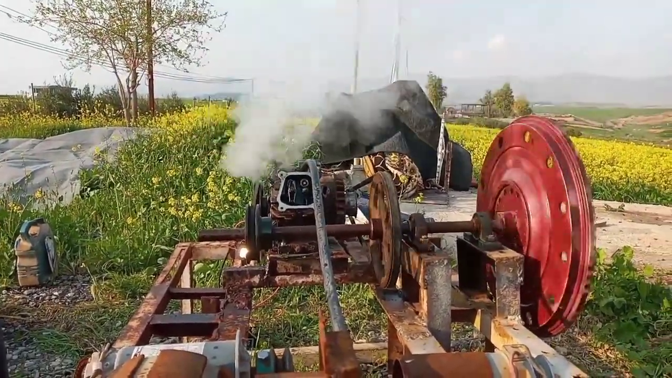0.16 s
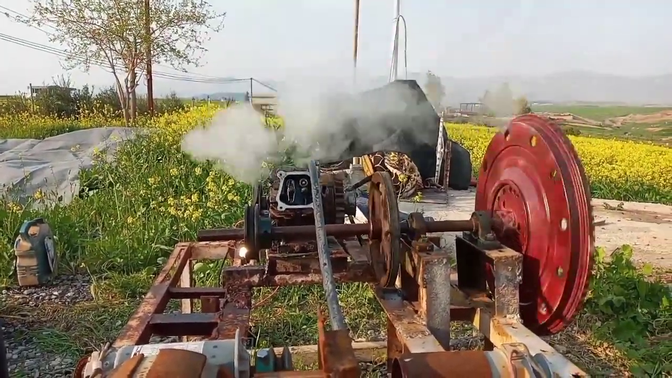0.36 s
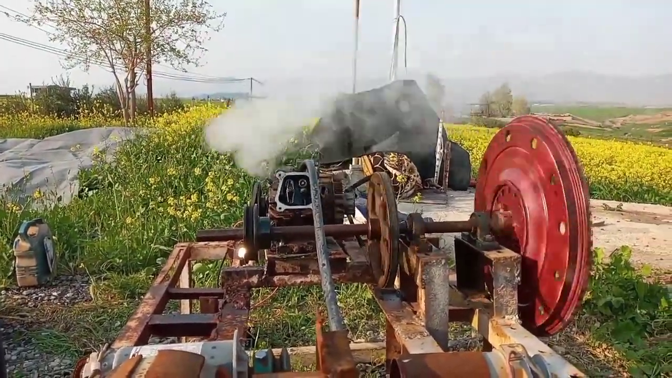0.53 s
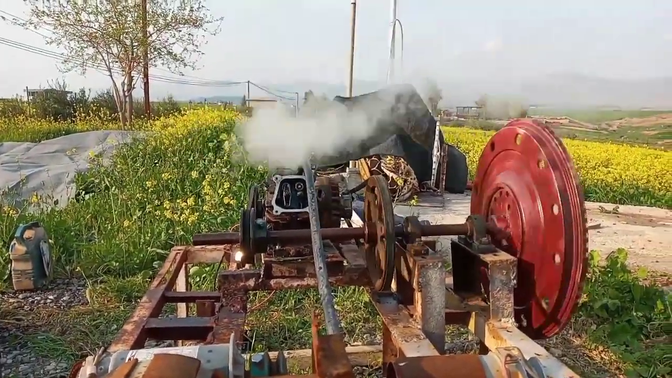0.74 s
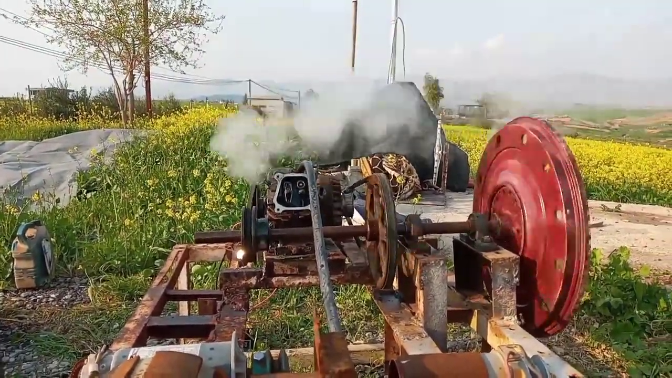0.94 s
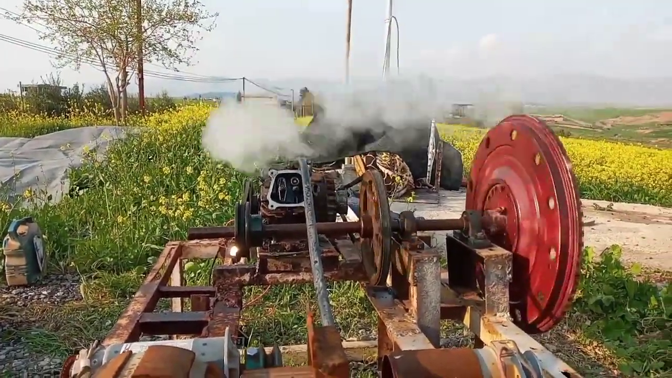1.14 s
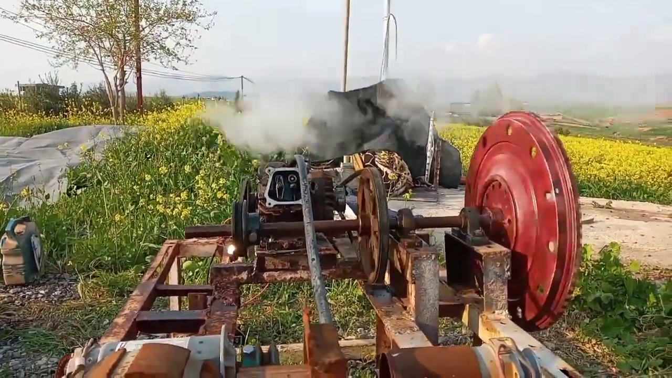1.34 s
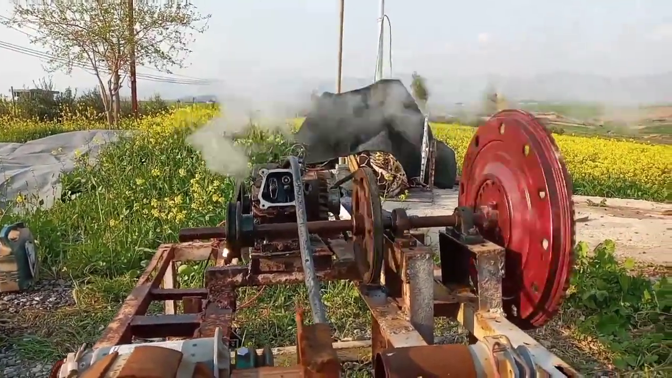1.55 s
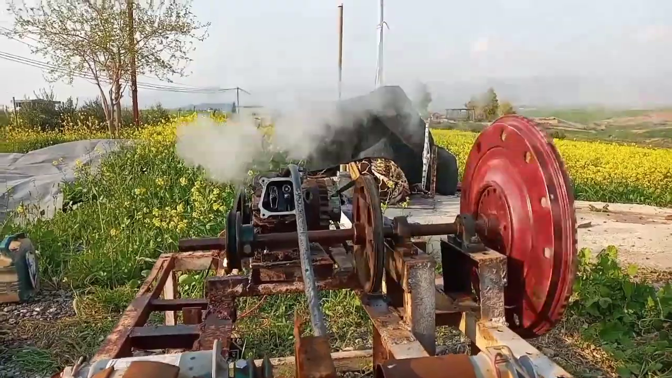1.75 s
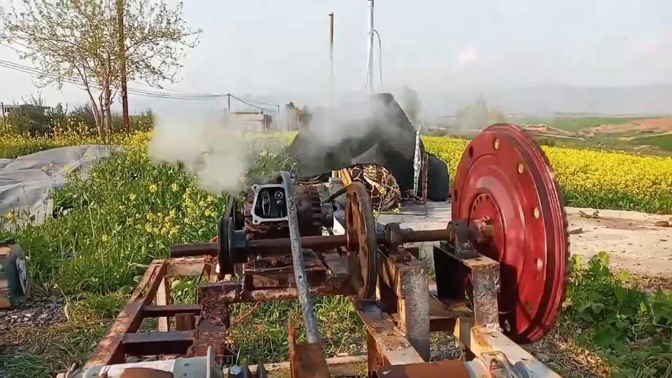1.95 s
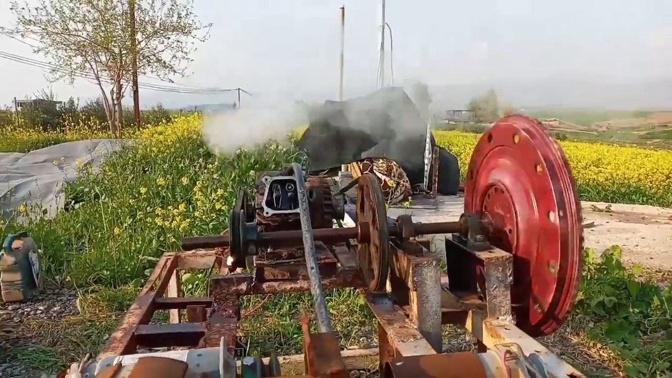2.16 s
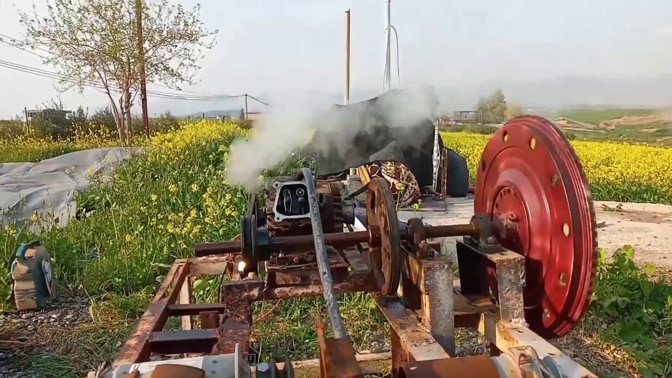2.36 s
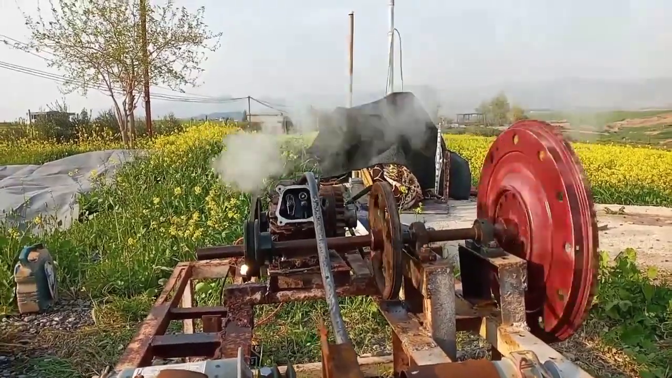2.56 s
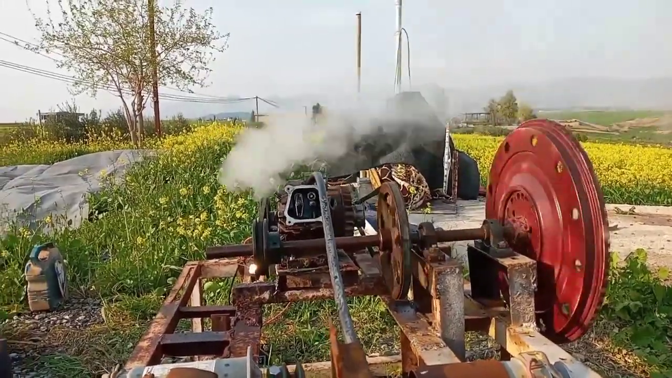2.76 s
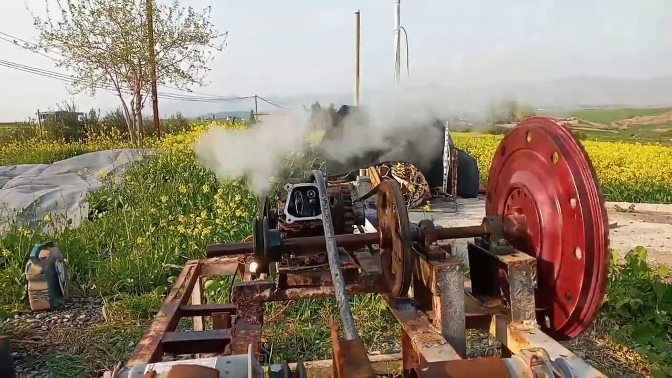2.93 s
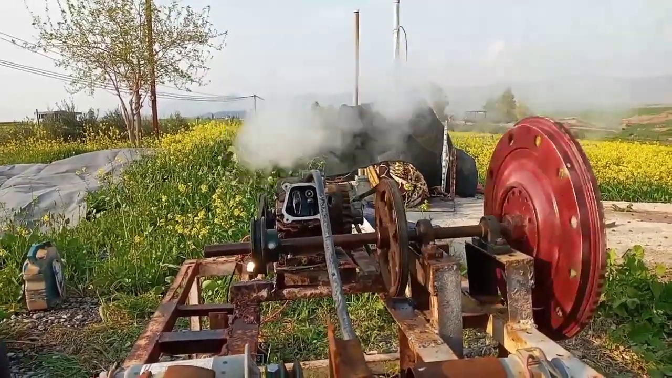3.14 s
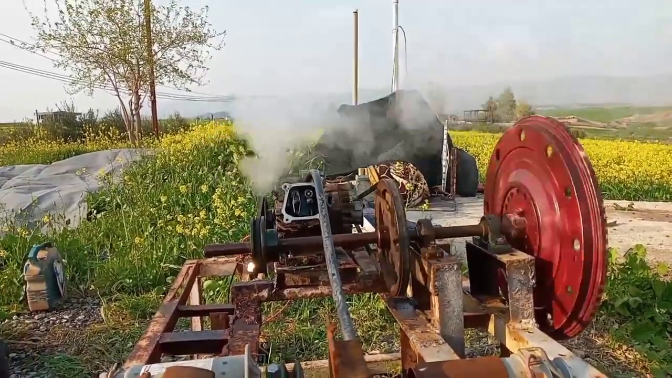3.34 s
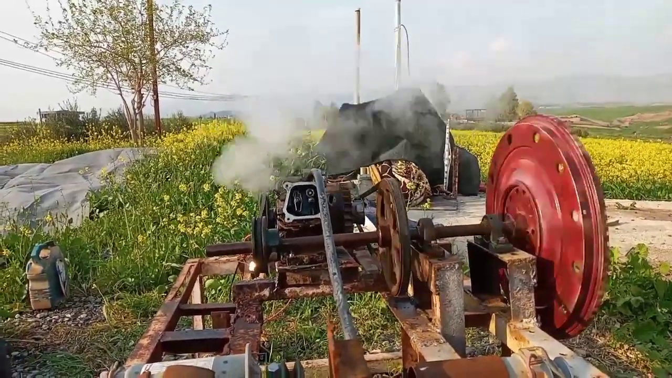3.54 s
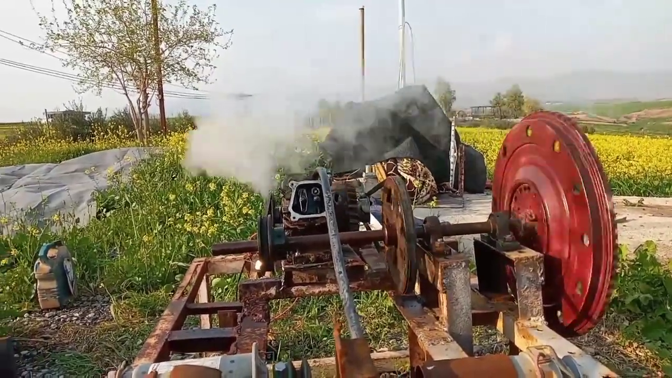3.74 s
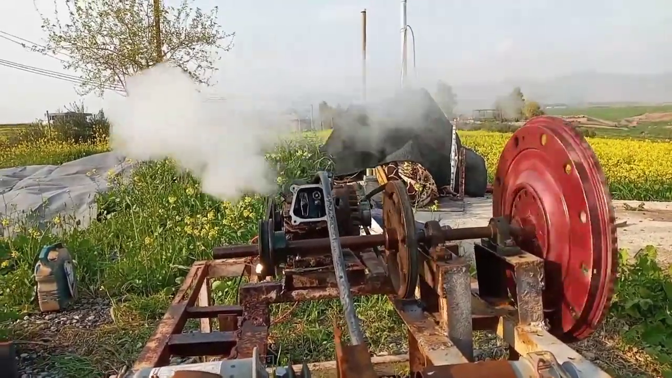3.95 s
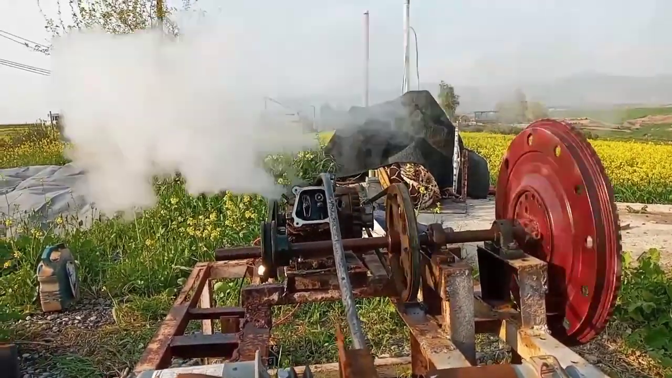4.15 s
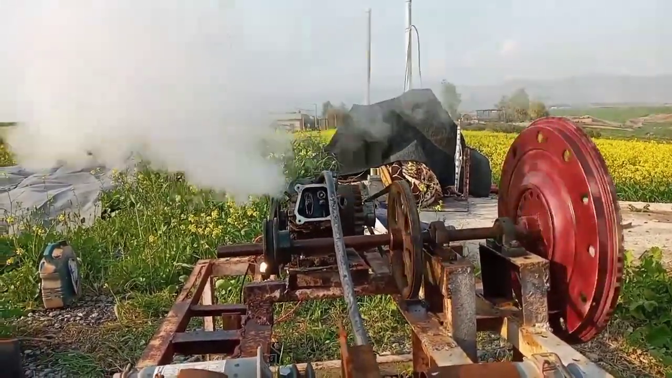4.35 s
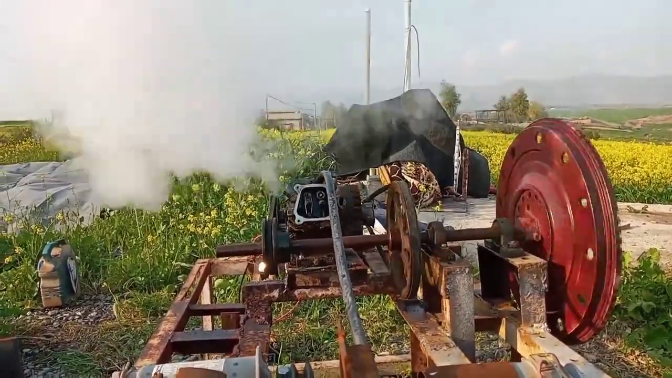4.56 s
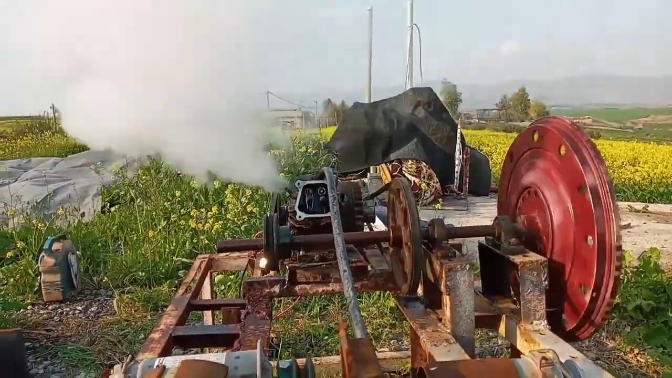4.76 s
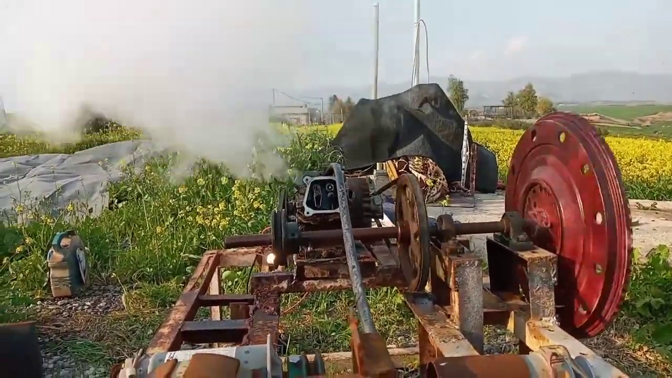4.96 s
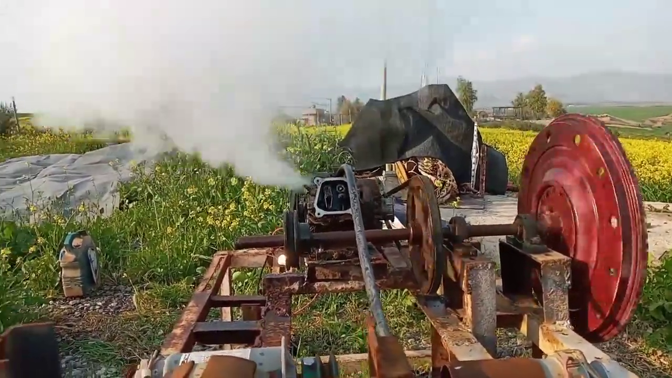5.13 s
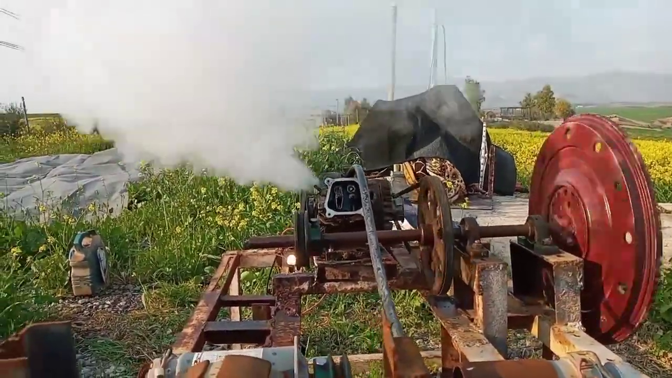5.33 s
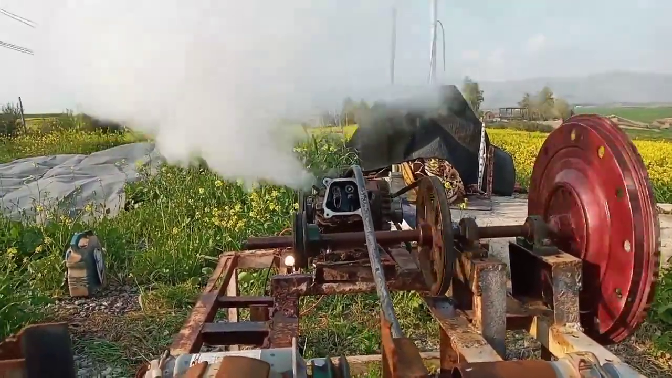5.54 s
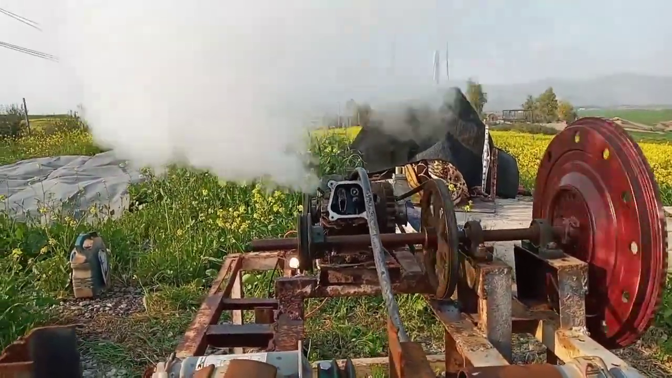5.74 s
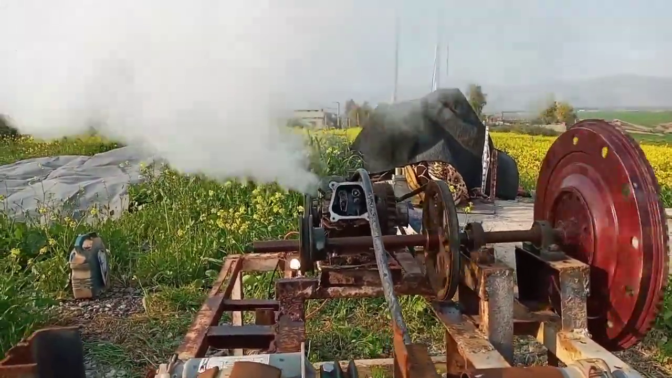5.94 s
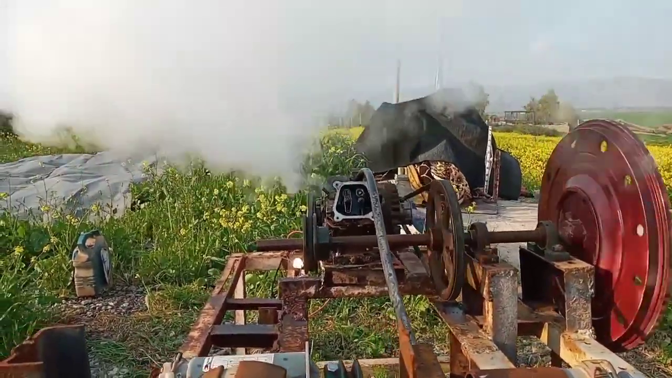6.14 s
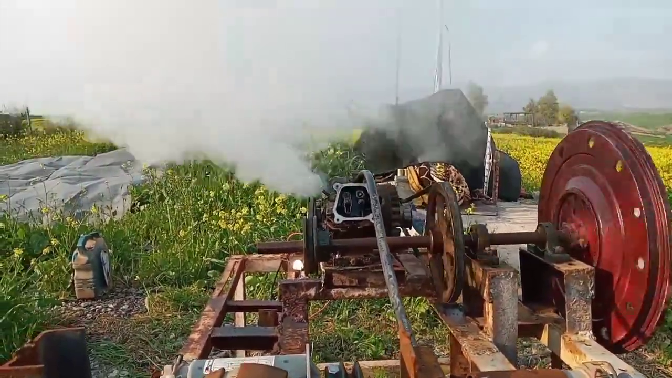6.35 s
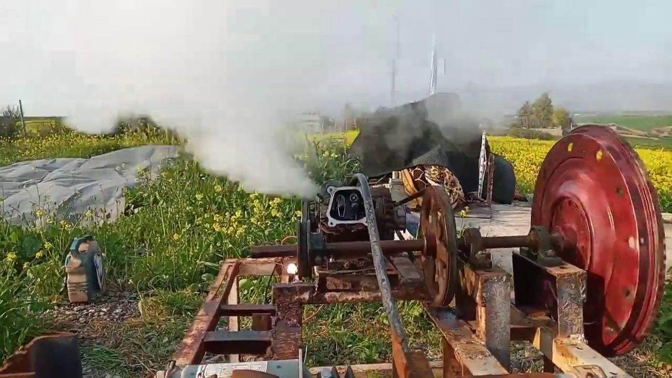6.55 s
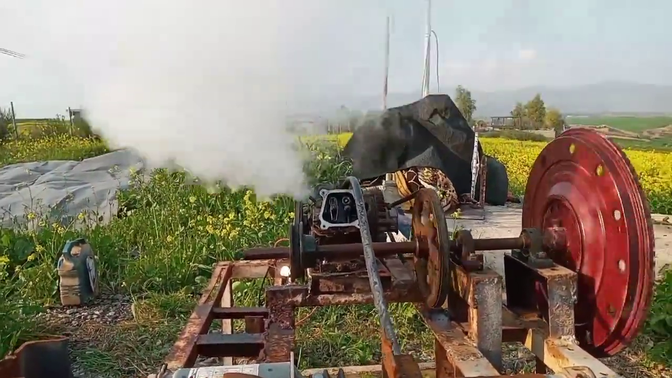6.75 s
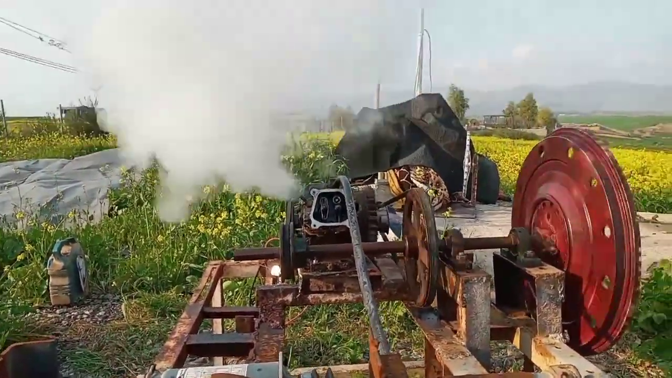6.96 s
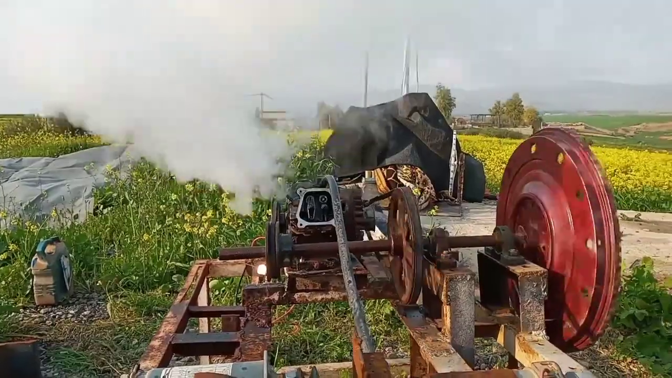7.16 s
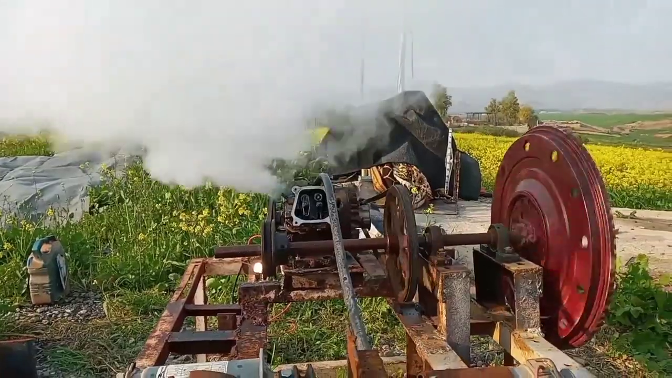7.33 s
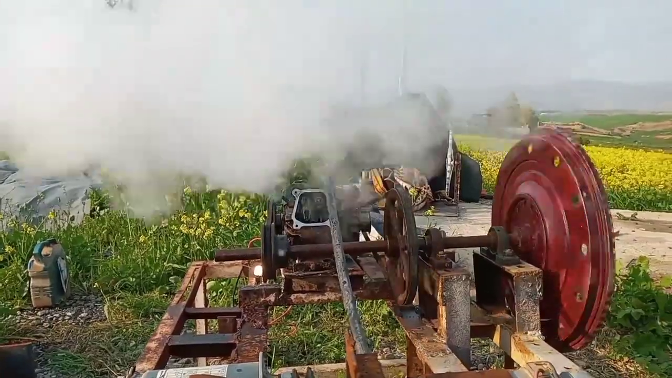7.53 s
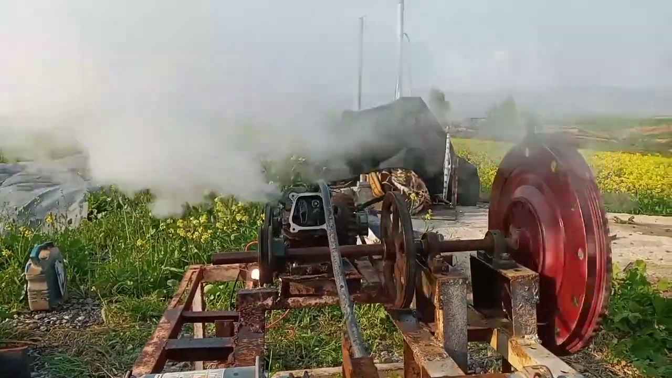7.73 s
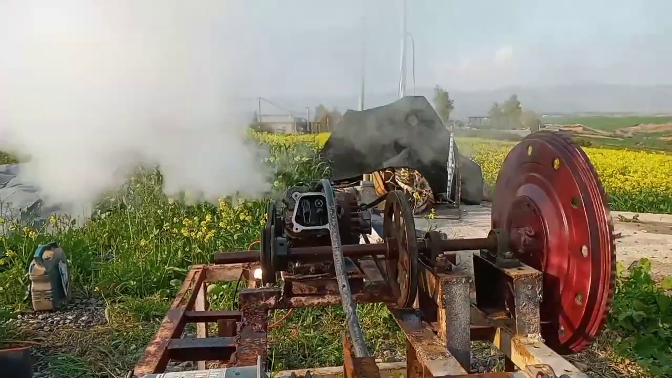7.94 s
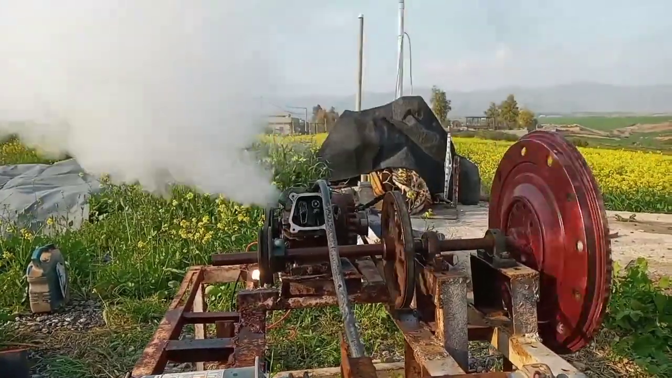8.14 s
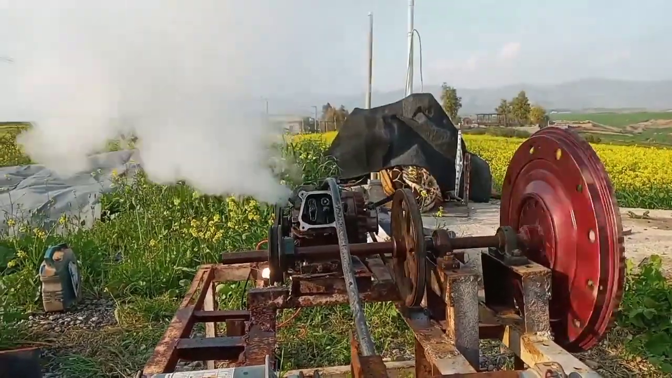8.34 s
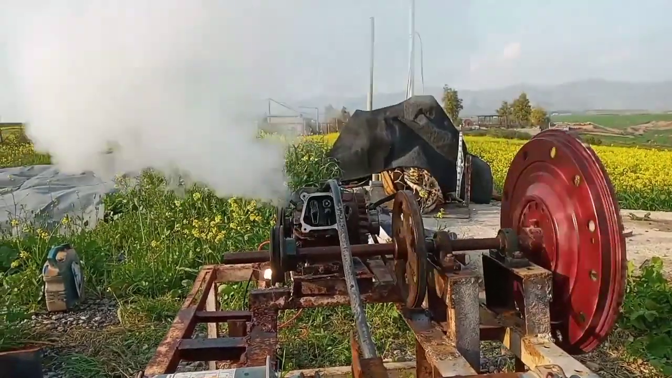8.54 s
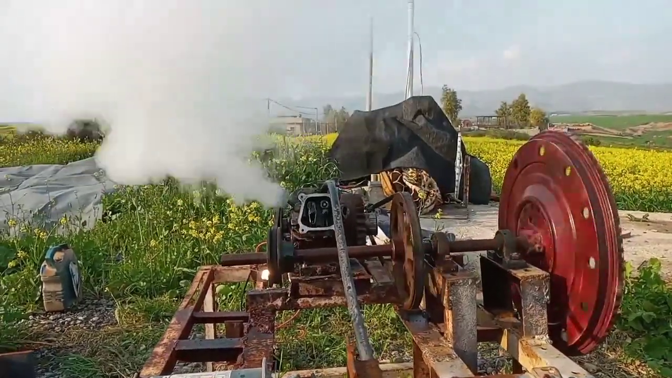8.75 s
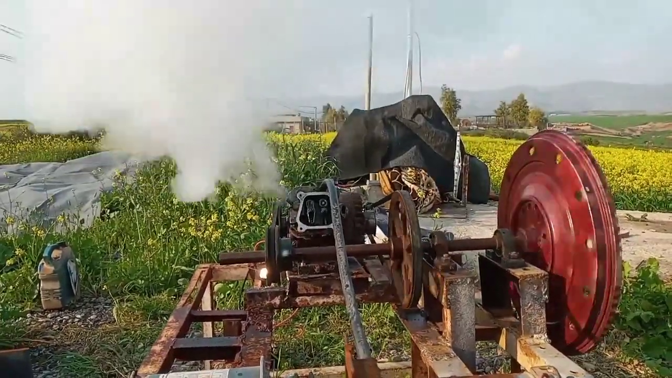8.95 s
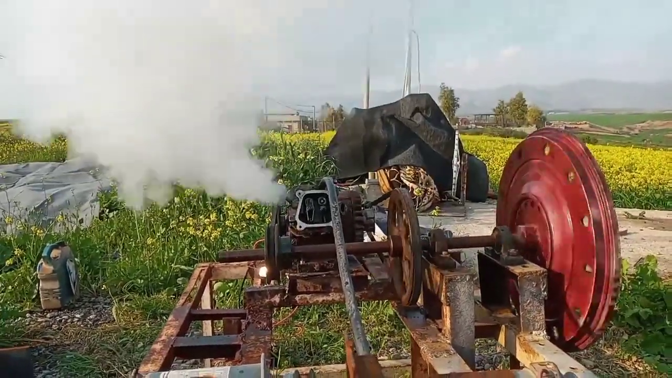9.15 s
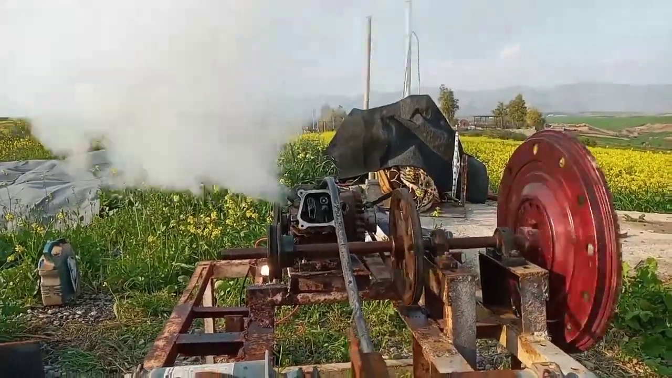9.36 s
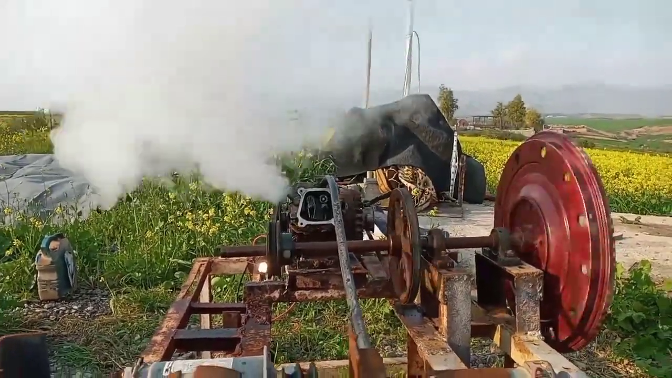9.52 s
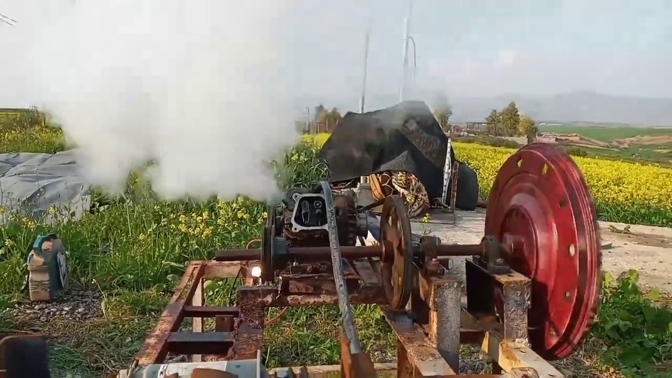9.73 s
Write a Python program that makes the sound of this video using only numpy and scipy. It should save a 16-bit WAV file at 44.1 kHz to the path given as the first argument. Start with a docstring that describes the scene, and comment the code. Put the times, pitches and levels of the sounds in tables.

```python
"""Steam chuffs twice a turn with a slight limp: first at idle with a leaking hiss, then, from about 4 s,
faster and harder with less leak. Drops of water crack in the pipe early on, and wind gusts rumble in stereo.
Each chuff is coloured noise shaped by a valve: a short blast, a hissing jet, a soft thump and a hollow note.
The leak and the wind are noise too. Two reflections and a thin scatter place the engine in the open air."""
import sys
import numpy as np
from scipy import signal
from scipy.fft import rfft, irfft, next_fast_len
from scipy.io import wavfile
from scipy.ndimage import map_coordinates

SR = 44100
rng = np.random.default_rng(int(sys.argv[2]) if len(sys.argv) > 2 else 0)


def dump(signal):
    """Clip the signal to [-1, 1] and save it as 16-bit WAV at the path in sys.argv[1]."""
    limited = np.clip(np.atleast_2d(signal).T, -1, 1)
    pcm = np.round(limited * 32767).astype(np.int16)
    wavfile.write(sys.argv[1], SR, pcm)


N = 431738
TIME = np.arange(N) / SR  # seconds

# How the engine is run. Each row: time in seconds, throttle from 0 to 1, base level of the leak in dB.
RUNNING = [(0, 0, -18.5), (3.7, 0, -18.5), (3.93, 0.7, -19.5), (4.07, 0.87, -25.5), (4.6, 0.94, -23),
           (5, 1, -27), (9.8, 0.98, -25.5)]
# Flywheel speed. Each row: time in seconds, speed in turns per second.
FLYWHEEL_SPEED = [(0.0, 3.2637), (2.0, 3.019), (2.82, 3.1006), (2.97, 2.9557), (3.89, 3.0313),
                  (4.12, 3.3609), (4.8, 3.7117), (4.95, 3.6865), (6.03, 3.9309), (7.88, 3.8815),
                  (8.06, 3.9991), (8.71, 4.0436), (9.22, 3.9226), (9.8, 4.0529)]
# The outward and return exhaust strokes. Each row: crank angle in turns, time the valve is open in turns,
# base level of the jet in dB, base level of the blast in dB.
IDLE_STROKES = [(0, 0.379, -20.5, -20), (0.5114, 0.346, -21, -20.5)]
LOADED_STROKES = [(0, 0.3717, -13.5, -14.5), (0.5253, 0.32, -13, -15)]
# Drops of water spat from the pipe. Each row: time in seconds, starting level in dB.
SPITS = [(.421, -26), (.57, -13), (1.21, -32), (1.41, -19), (2.063, -26)]
# Wind gusts. Each row: start in seconds, length in seconds, left level in dB, right level in dB.
GUSTS = [(0, 0.38, -32, -43), (0.082, 0.22, -49, -21), (.8, 0.77, -44, -55), (0.957, 0.07, -28, -41),
         (1.5, 0.535, -32, -56), (2.054, .53, -34.5, -44), (3.058, 0.73, -41, -50), (3.42, 0.056, -31, -32),
         (5.08, .3, -42, -27), (5.397, 0.21, -51, -31), (5.645, 0.52, -65, -40)]

# Peaks (positive) and dips (negative) in the colour of the steam, under load and at idle.
# Each row: centre in Hz, width in Hz, height in dB.
LOADED_COLOUR = [(1656, 240, 6), (1760, 170, -1.5), (2270, 200, 4.5), (2380, 90, -6.5), (2617, 310, 9),
                 (2900, 130, -8), (3280, 830, 4.5), (3670, 150, -10.5), (4110, 340, 5.5), (4860, 110, 5.5),
                 (4945, 186, -5.5), (6360, 210, 6.5), (6650, 290, -8), (7180, 300, 1.5)]
IDLE_COLOUR = [(863, 120, 6), (1580, 180, 2.5), (2330, 130, -12.5), (2630, 335, 14), (2960, 81, -5),
               (3080, 290, 4.5), (3450, 170, -2), (3700, 110, -10.5), (3980, 300, 5), (4340, 230, 3),
               (5660, 140, 6), (6570, 250, 8), (6950, 220, -4), (7240, 200, 2), (7650, 240, 0)]

# Noise colours of each sound. Each row: frequency in Hz, relative level per Hz in dB.
SOFT_JET = [(60, -30), (250, -30), (700, -9.5), (950, -1), (1400, -8), (2500, -17), (3200, 1), (5000, -3.5),
            (6200, 4.5), (7400, -9.5), (10500, 1), (13000, -6), (15500, -5)]
HARD_JET = [(60, -20.5), (250, -22), (700, -9), (1000, -6.5), (2000, -6), (3200, 1), (4600, -1.5),
            (6000, 2), (7400, 4.5), (8500, -11.5), (11500, -6), (15500, -6)]
FIZZ = [(4000, -35), (7000, -13), (9000, 3.5), (11500, 3), (15500, -2.5)]
BLAST = [(40, -37), (90, -17), (250, -10), (650, -14), (1000, -4), (1450, 4), (2200, 0.5), (3200, -6),
         (4500, 5), (7000, -3.5), (10000, -6), (15500, -42)]
HOLLOW = [(150, -33), (290, -11.5), (390, -1.5), (480, 0), (560, -3), (650, -40), (1200, -23.5)]
LEAK = [(60, -16.5), (250, -13), (600, -9.5), (1000, -8), (1700, -3.5), (3000, -11.5), (5000, -6),
        (6500, -4), (7600, 5.5), (9000, 2), (10500, -1.5), (12000, -9.5), (13200, -16), (15500, -0.5)]
BUFFET = [(20, -30), (42, -22), (72, 1), (140, -0.5), (250, -10), (450, -10.5), (900, -37), (3000, -70)]  # low rumble, for the thump of a blast and for the wind

# Colour of the two microphone ports. Each row: frequency in Hz, level in dB.
LEFT_PORT = [(200, 1.5), (500, 3), (1600, 3), (2300, 1.5), (4000, -0.5), (5700, 1.1), (6300, 3), (7200, 2),
             (7680, 0.2), (7950, -5), (9000, -5.5), (11500, -8.5), (14300, -5.5), (14800, 1.3),
             (15600, -11)]
RIGHT_PORT = [(200, -1.5), (500, 1), (1600, -4), (2300, 0), (4000, -0.5), (5900, -0.5), (7000, -4.5),
              (7600, -18), (8050, -22), (8800, -8.5), (10000, -3), (11500, 2), (13000, -3.5), (14800, -5.5),
              (15600, -19)]
# Stereo widening: how far the other port is blended in. Each row: frequency in Hz, angle in radians.
INTO_LEFT = [(150, .1), (450, 1), (1000, .65), (1700, .6), (2450, .8), (3100, .9), (3700, .92), (4600, .77),
             (5700, .68), (6500, .41), (7300, .3), (8100, -.07), (10500, -.3), (15000, -.23)]
INTO_RIGHT = [(150, -.06), (450, .17), (1000, 0), (1700, 0), (2450, .3), (3100, .6), (3700, .52),
              (4600, .33), (5700, .28), (6500, .11), (7300, 0), (8100, .05), (10500, -.18), (15000, -.11)]

START_TURNS = .326  # where the crank stands at the beginning
# no two strokes are quite alike: typical random change of each
JET_SCATTER_DB, BLAST_SCATTER_DB, OPEN_SCATTER_S = 0.6, 0.5, 0.0005
PRESSURE_LAW = 0.62  # steam pressure follows the throttle by this power
GUST_RISE_S, GUST_DROOP_DB_PER_S, GUST_FADE_S = 0.036, 0.5, 0.056
CROSS_DELAY_S, TOP_HZ = .00099, 15800


def exhaust(throttle, flutter_db=1.51, gurgle_db=2, thump_db=-23):
    """Steam leaves the pipe in fluttering bursts, fuller in the middle range as the throttle opens."""
    jet, fizz, blast, hollow = strokes(throttle)
    load = np.clip(throttle, 0, 1)
    soft_roar = np.sqrt(1 - load) * rush(SOFT_JET, IDLE_COLOUR)
    hard_roar = np.sqrt(load) * rush(HARD_JET, LOADED_COLOUR)
    flutter = amp(flutter_db * unit(wobble(170) + 0.11 * wobble(45) + 0.34 * wobble(700)))
    jet_noise = jet * (soft_roar + hard_roar)
    fizz_noise = fizz * rush(FIZZ)
    blast_noise = blast * rush(BLAST, LOADED_COLOUR)
    hiss = eddies(flutter * (jet_noise + fizz_noise + blast_noise), depth_db=2, width_hz=400, life_s=.045)
    # each blast also shoves the air, a soft thump
    thump = amp(thump_db) * blast * rush(BUFFET)
    gurgle = amp(1 + gurgle_db * wobble(60))
    return hiss + thump + hollow * gurgle * rush(HOLLOW)


def strokes(throttle):
    """The valve shapes each stroke: strength of the jet, its fizz, the blast and the hollow note over time."""
    flows = np.zeros((4, N))
    for start, load, open_s, jet_db, blast_db in beats(throttle):
        span = slice(*np.searchsorted(TIME, [start - .03, start + .18]))
        t = TIME[span] - start
        idle = 1 - load
        valve = ramp((t + 0.0027) / 0.01) * ramp((open_s - .004 - t) / 0.022)
        # at idle the flow sags until the piston pushes again; under load the cylinder empties steadily
        sag_db = -idle * 2.2 * bump(t, 0.011, 0.048) - load * 28 * (t - .036)
        jet = valve * amp(jet_db + sag_db)
        # the finest hiss needs high pressure and dies first, well before the valve shuts
        fizz = load * jet * amp(-4.5) * ramp((0.76 * open_s - t) / 0.052)
        # the blast is shorter under load; a weaker puff comes as the valve closes
        opening = load * 1.19 * bump(t, 0.0028, 0.0063) + idle * 0.96 * bump(t, 0.015, 0.012)
        closing = amp(-7.5 - 1.7 * load) * bump(t, open_s - .016, .012)
        blast = amp(blast_db) * valve * (opening + closing)
        loaded_hollow = load * amp(-30.5) * bump(t, 0.038, 0.02)
        idle_hollow = idle * amp(-31.5) * bump(t, 0.044, 0.03)
        flows[:, span] += jet, fizz, blast, valve * (loaded_hollow + idle_hollow)
    return flows


def beats(throttle):
    """The crank opens the valve twice a turn; pressure makes the strokes stronger and their limp more marked."""
    speed, = curves(FLYWHEEL_SPEED)
    crank = START_TURNS + np.cumsum(speed) / SR  # turns so far
    for turn in range(int(crank[-1]) + 1):
        for idle, loaded in zip(np.array(IDLE_STROKES), np.array(LOADED_STROKES)):
            chance = rng.standard_normal(3)
            now = min(np.searchsorted(crank, turn + idle[0]), N - 1)
            load = np.clip(throttle[now], 0, 1)
            angle = idle[0] + load * (loaded[0] - idle[0])
            _, open_turns, jet_db, blast_db = idle + load ** PRESSURE_LAW * (loaded - idle)
            start = TIME[now] + (turn + angle - crank[now]) / speed[now]
            open_s = open_turns / speed[now] + OPEN_SCATTER_S * chance[0]
            jet_db += JET_SCATTER_DB * chance[1]
            blast_db += BLAST_SCATTER_DB * chance[2]
            yield start, load, open_s, jet_db, blast_db


def leak(leak_db, waver_db=0.94, sputter_db=1.1):
    """Steam hisses past the valve between the strokes too, wavering slowly and sputtering fast."""
    level_db = leak_db + waver_db * wobble(22) + sputter_db * wobble(250)
    return amp(level_db) * rush(LEAK, IDLE_COLOUR)


def spits(t60=0.012):
    """Drops of water crack in the pipe: noise that falls by 60 dB in t60 seconds."""
    size = np.zeros(N)
    t = np.arange(SR // 20) / SR
    for start, db in SPITS:
        size[int(start * SR):][:len(t)] += amp(db - 60 * t / t60)
    return size * rush(SOFT_JET, LOADED_COLOUR)


def eddies(x, depth_db, width_hz, life_s):
    """Drifting eddies lift and dull patches of the spectrum."""
    z = signal.stft(x, nperseg=512)[2]
    rows, columns = np.indices(z.shape[1:])
    # a smooth random map over frequency and time
    place = [rows * SR / 512 / width_hz, columns * 256 / SR / life_s]
    patches = map_coordinates(rng.standard_normal(z.shape[1:]), place)
    return signal.istft(z * amp(depth_db * patches), nperseg=512)[1][:, :N]


def bounce(x, delay_s, db, sway):
    """One reflection; its path changes as the plume and microphone sway, so ripples slide through the hiss."""
    late = (TIME - delay_s * (1 + sway * wobble(3))) * SR  # sample to read at each moment
    copy = np.array([np.interp(late, np.arange(N), port) for port in x])
    return amp(db) * copy


def field(x, t60=0.083):
    """A short, thin scatter from the frame, the ground and the plants, made with a fading noise tail."""
    t = np.arange(SR // 3) / SR
    tail = rng.standard_normal((2, len(t))) * amp(-60 * t / t60) * ramp((t - .006) / 0.037)
    return signal.fftconvolve(x, tail / np.linalg.norm(tail[0]), axes=1)[:, :N]


def wind(lump_db=3.5, calm_db=-53, rasp_db=-10):
    """Gusts buffet each port on its own; the strongest ones add a rasp above the rumble."""
    strength = amp(calm_db)
    for start, length, left_db, right_db in GUSTS:
        strength = strength + amp([[left_db], [right_db]]) * gust(start, length)
    lumps = amp(lump_db * np.array([wobble(25), wobble(25)]))
    rasp_colour = [(80, -20), (200, -4), (330, 7), (480, -11), (800, -32), (2500, -60)]
    rasp = amp(rasp_db) * np.sqrt(strength / strength.max()) * rush(rasp_colour)
    return strength * unit(lumps) * (rush(BUFFET) + rasp)


def gust(start, length):
    """A gust rises quickly, holds almost steady and fades."""
    t = TIME - start
    hold = amp(-GUST_DROOP_DB_PER_S * np.clip(t, 0, length))
    return ramp(t / GUST_RISE_S) * hold * ramp((length - t) / GUST_FADE_S)


def rush(spectrum, colour=()):
    """Turbulent noise of rms 1, unrelated at the two ports, with peaks and dips in its colour."""
    m = next_fast_len(N, True)
    coarse = np.linspace(0, SR / 2, 4097)
    shape_db = sum(db / (1 + (2 * (coarse - hz) / width) ** 2) for hz, width, db in colour)
    coarse_gain = amp(along(spectrum, coarse) + shape_db)
    gain = np.interp(np.fft.rfftfreq(m, 1 / SR), coarse, coarse_gain)
    white = rng.standard_normal((2, 2 * len(gain))).view(complex)
    return unit(irfft(white * gain, m)[:, :N])


def wobble(rate, order=8):
    """A smooth random curve through rate random points a second."""
    knots = rng.standard_normal(int(N * rate / SR) + 4)
    steps = np.arange(len(knots) * order) / order
    return np.interp(TIME * rate, steps, map_coordinates(knots, [steps]))


def filtered(x, response):
    """Sound x with its spectrum multiplied by a response that depends on frequency."""
    m = next_fast_len(N + 8192, True)
    return irfft(rfft(x, m) * response(np.fft.rfftfreq(m, 1 / SR)), m)[..., :N]


def along(points, hz):
    """Read a curve of (Hz, value) points on a log frequency axis."""
    f, v = np.transpose(points)
    return np.interp(np.log(hz + 1), np.log(f + 1), v)


def curves(rows):
    """One value per sample for each column after the time."""
    s, *columns = np.transpose(rows)
    return [np.interp(TIME, s, column) for column in columns]


def ramp(u):
    """A smooth step from 0 to 1, centred on u = 0 and one unit wide."""
    return .5 + .5 * np.sin(np.pi * np.clip(u, -.5, .5))


def bump(t, centre, width):
    """A bell of height 1."""
    return np.exp(-.5 * ((t - centre) / width) ** 2)


def amp(db):
    """Turn decibels into a plain multiplier."""
    return 10 ** (np.asarray(db) / 20)


def unit(x):
    """Scale a signal to an rms of 1."""
    return x / np.sqrt(np.mean(x ** 2) + 1e-20)


def scene():
    """The engine in the open air, and the wind."""
    throttle, leak_db = curves(RUNNING)
    # under pressure the valve seats unevenly, so the leak wanders more
    seating_db = 1.4 * throttle * wobble(7.9)
    leaking = eddies(leak(leak_db + seating_db), depth_db=2.0, width_hz=504, life_s=.06)
    steam = exhaust(throttle) + leaking + spits()
    ground = bounce(steam, delay_s=.0062, db=-9, sway=.03)
    frame = bounce(steam, delay_s=.0029, db=-13, sway=.04)
    # long waves bend round the ironwork, only short ones come back
    reflections = filtered(ground + frame, lambda f: ramp((f - 900) / 900))
    engine = steam + reflections + amp(-25.5) * field(steam)
    return amp(-1) * engine + wind()


def record(dry):
    """The microphone blends a late copy of each port into the other channel, colours both and limits the band."""
    def angle(f):
        return np.array([along(INTO_LEFT, f), along(INTO_RIGHT, f)])

    def colour(f):
        return amp([along(LEFT_PORT, f), along(RIGHT_PORT, f)])

    def late(f):
        return np.exp(-2j * np.pi * f * CROSS_DELAY_S)

    direct = filtered(dry, lambda f: colour(f) * np.cos(angle(f)))
    crossed = filtered(dry[::-1], lambda f: colour(f) * np.sin(angle(f)) * late(f))
    return filtered(np.clip(direct + crossed, -1, 1), lambda f: f < TOP_HZ)


dry = scene()
out = record(dry)
dump(out)
```